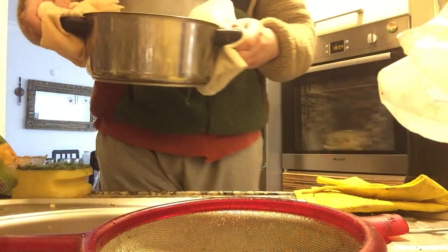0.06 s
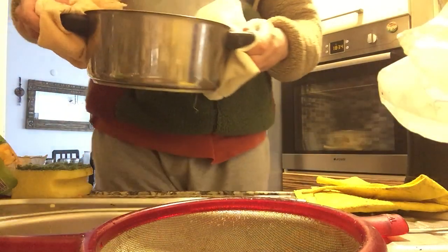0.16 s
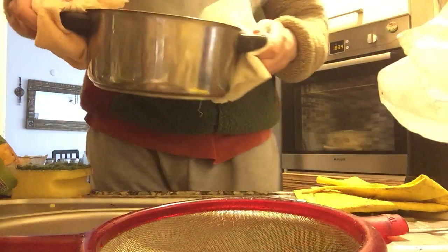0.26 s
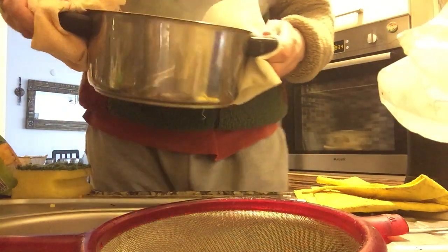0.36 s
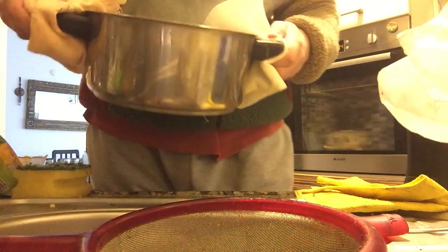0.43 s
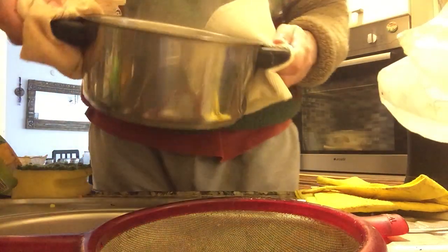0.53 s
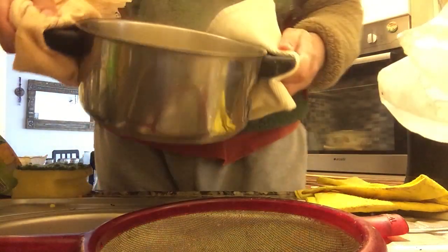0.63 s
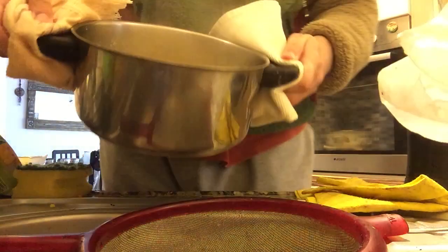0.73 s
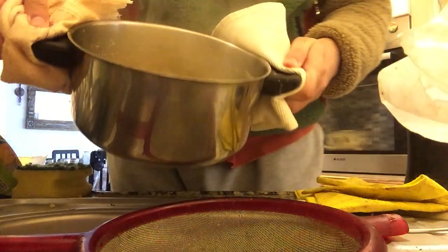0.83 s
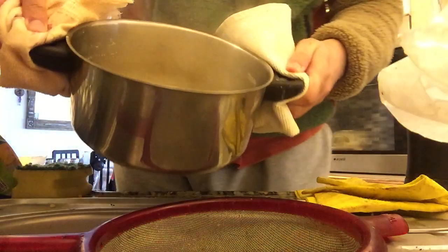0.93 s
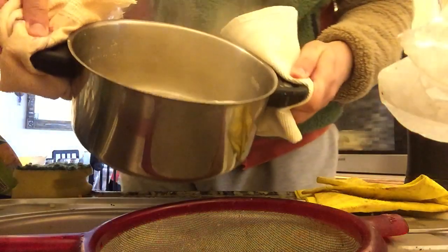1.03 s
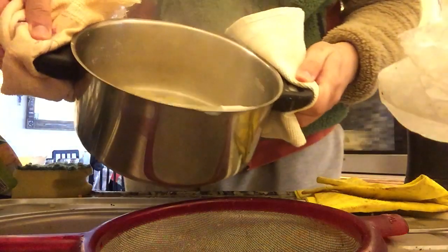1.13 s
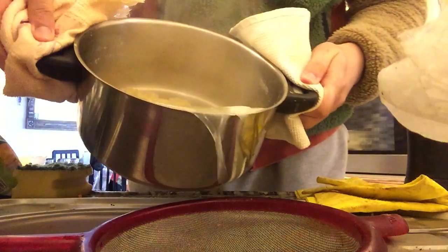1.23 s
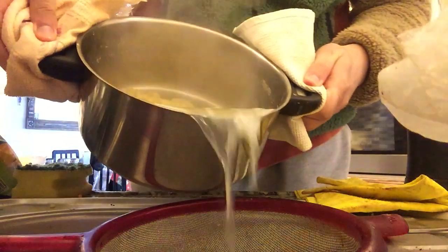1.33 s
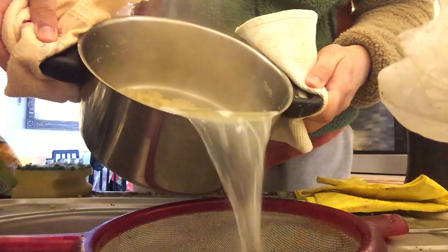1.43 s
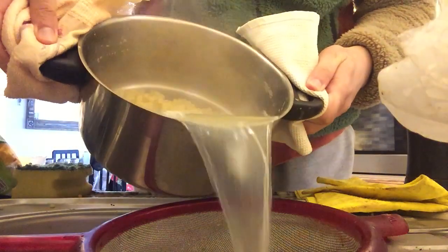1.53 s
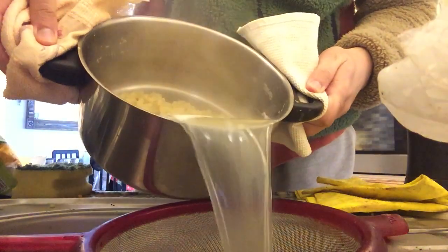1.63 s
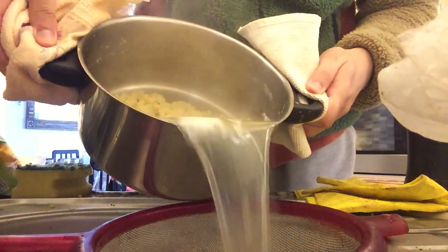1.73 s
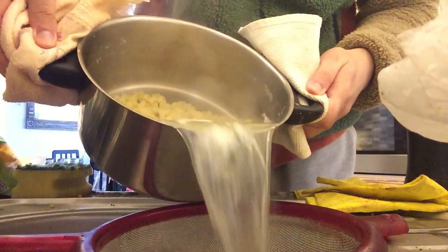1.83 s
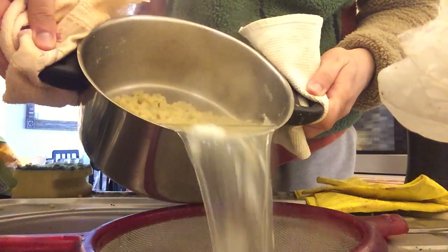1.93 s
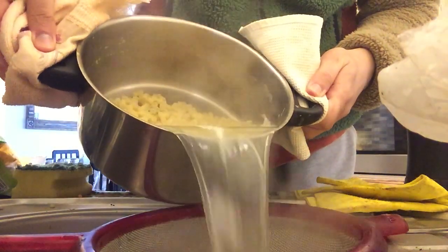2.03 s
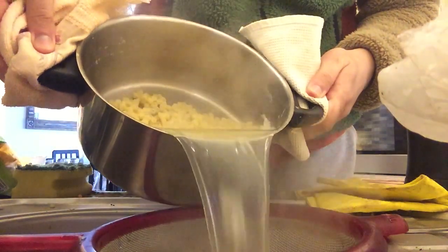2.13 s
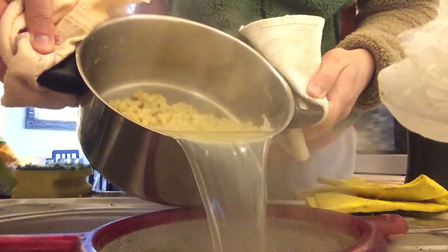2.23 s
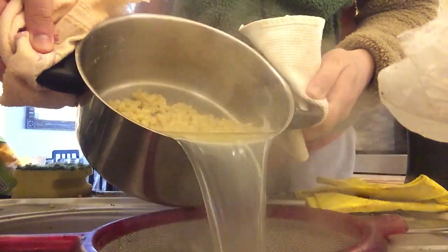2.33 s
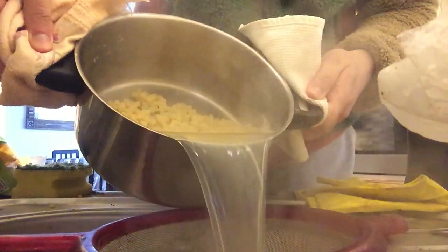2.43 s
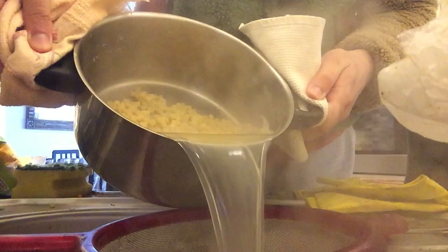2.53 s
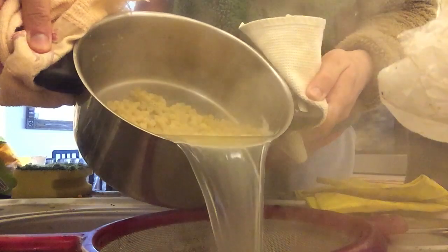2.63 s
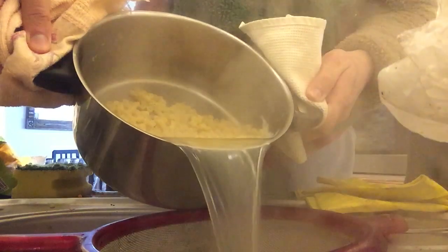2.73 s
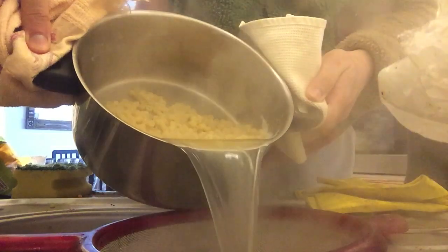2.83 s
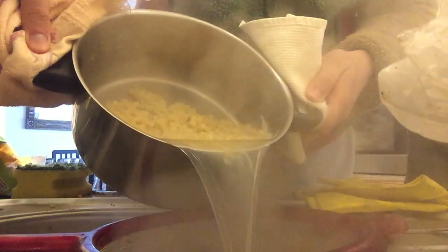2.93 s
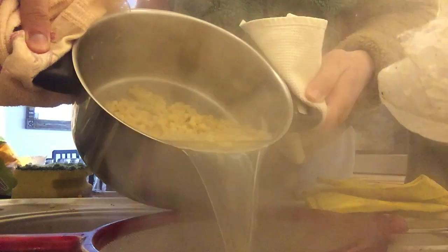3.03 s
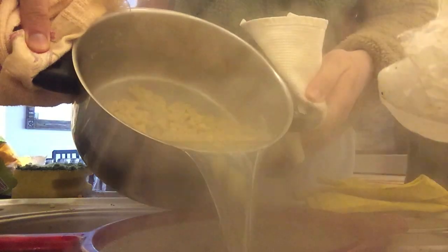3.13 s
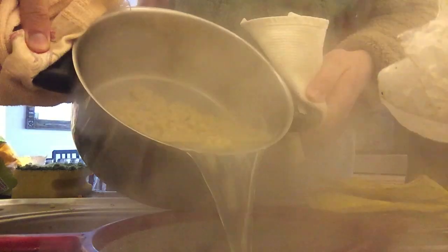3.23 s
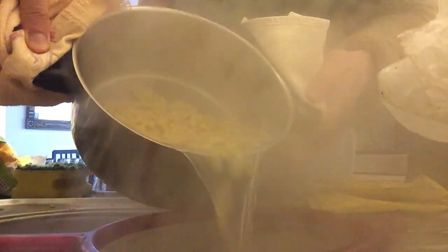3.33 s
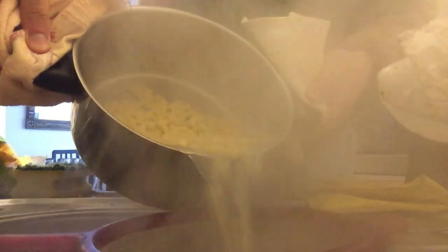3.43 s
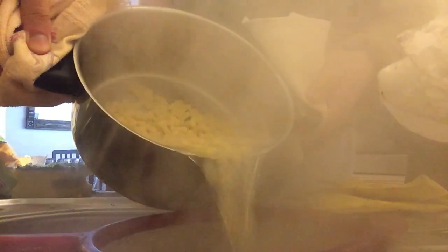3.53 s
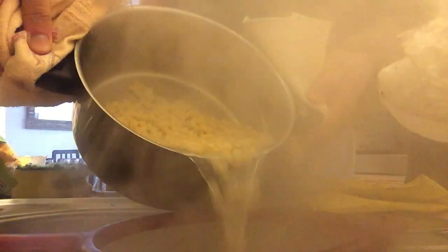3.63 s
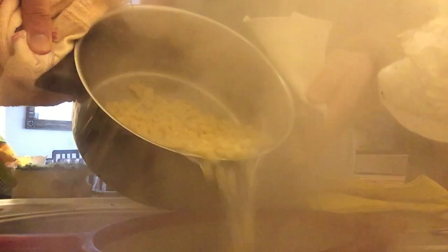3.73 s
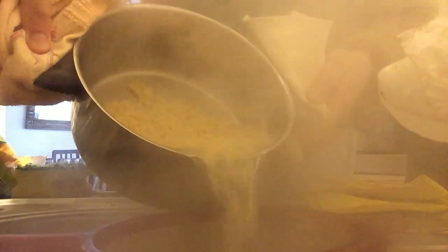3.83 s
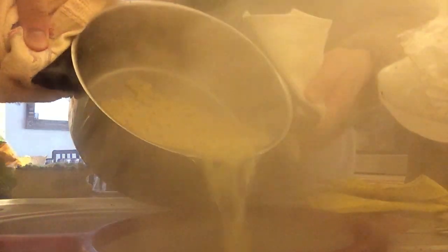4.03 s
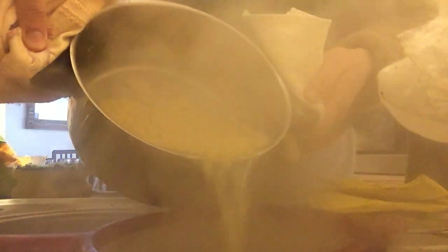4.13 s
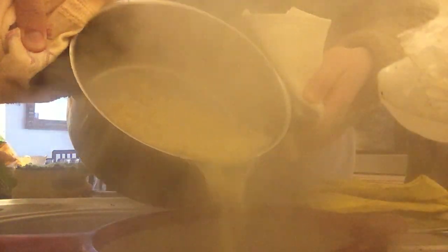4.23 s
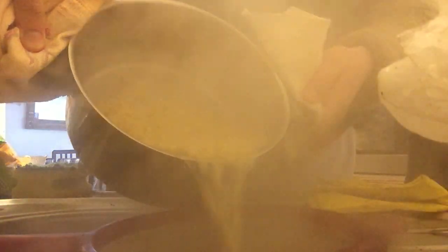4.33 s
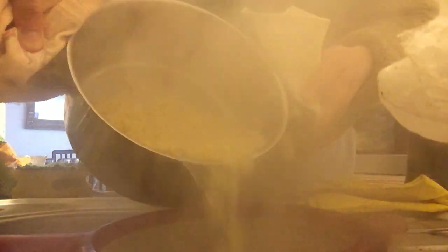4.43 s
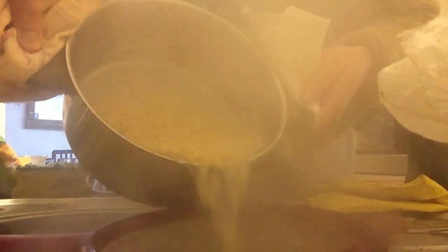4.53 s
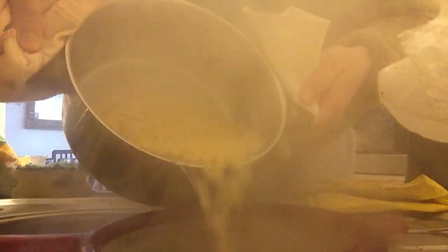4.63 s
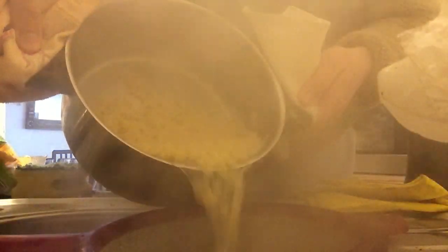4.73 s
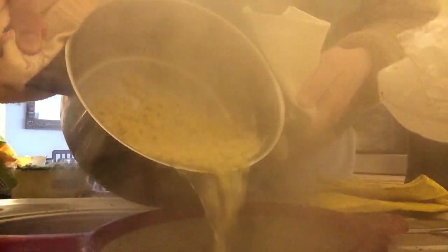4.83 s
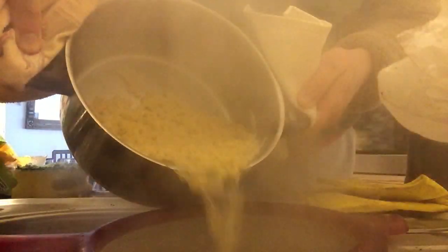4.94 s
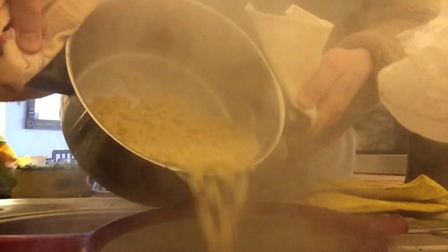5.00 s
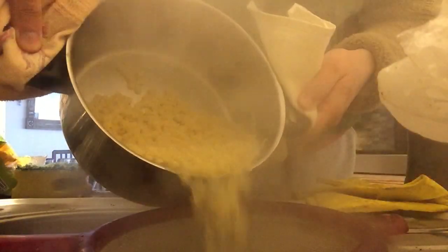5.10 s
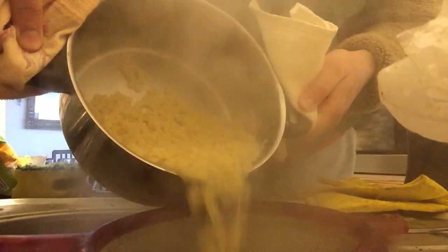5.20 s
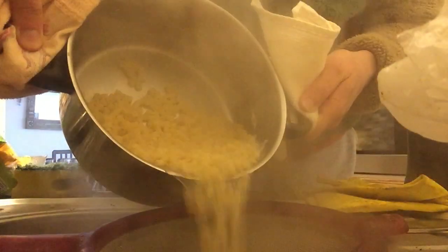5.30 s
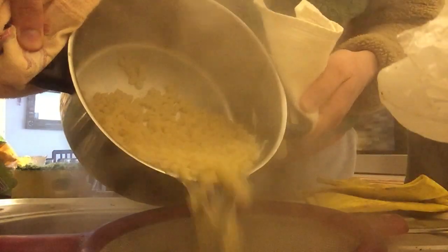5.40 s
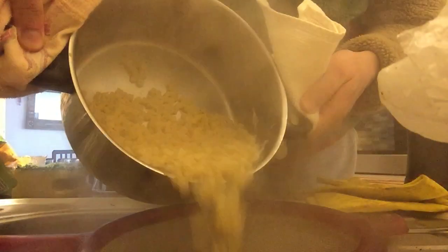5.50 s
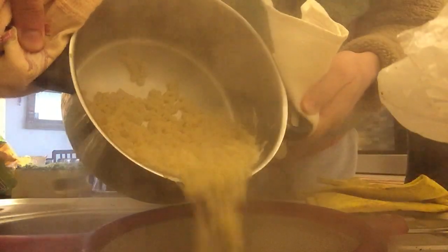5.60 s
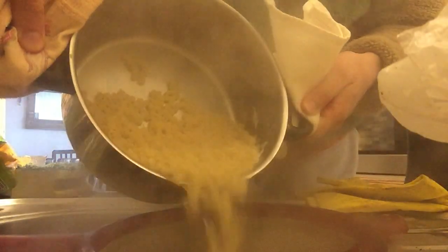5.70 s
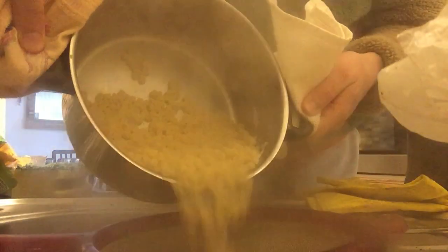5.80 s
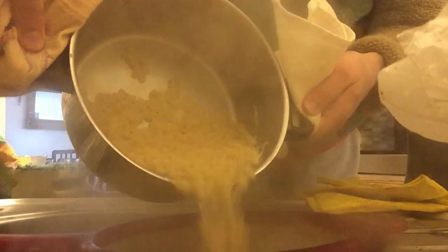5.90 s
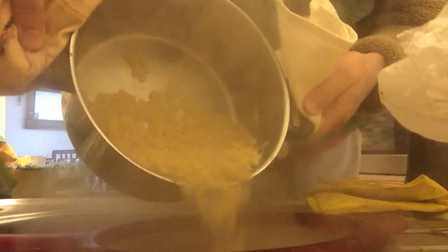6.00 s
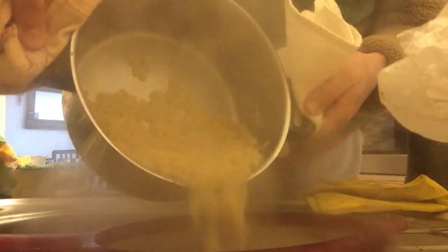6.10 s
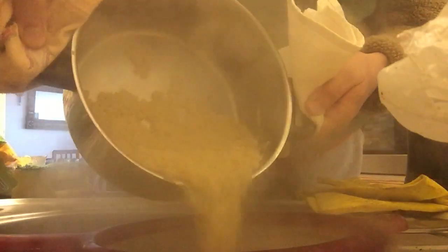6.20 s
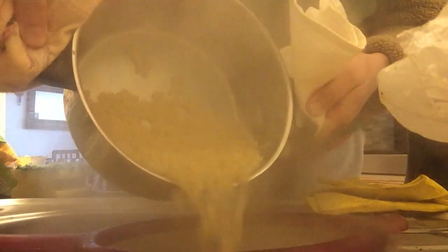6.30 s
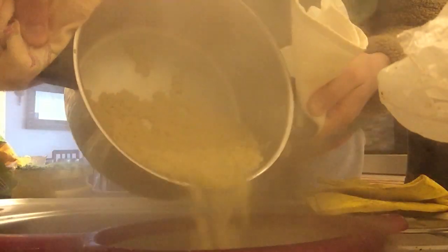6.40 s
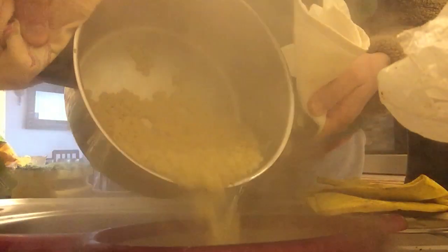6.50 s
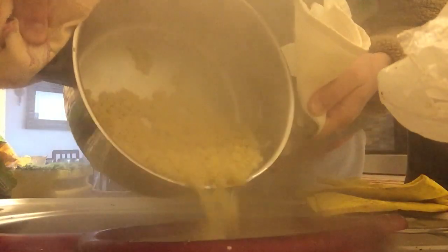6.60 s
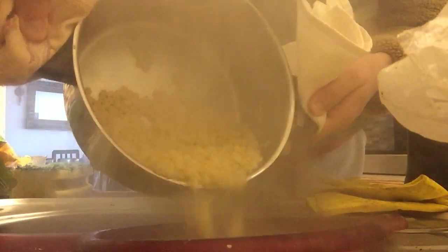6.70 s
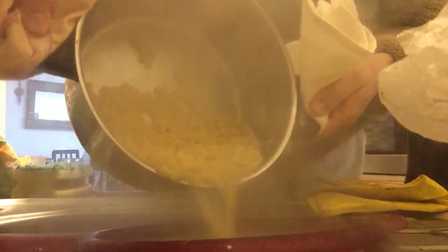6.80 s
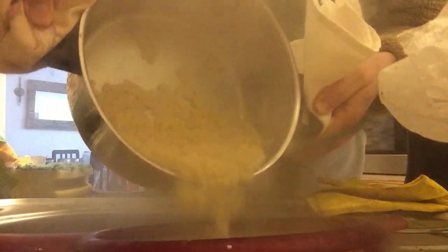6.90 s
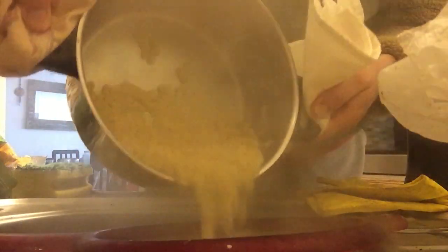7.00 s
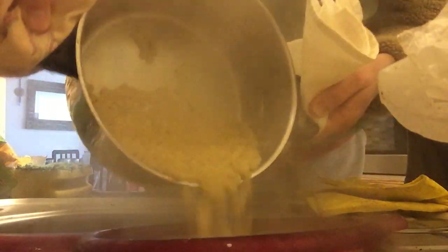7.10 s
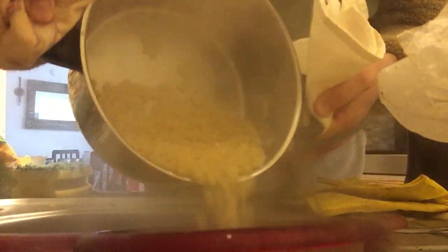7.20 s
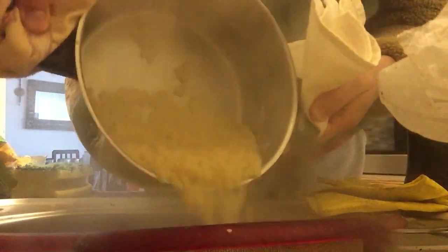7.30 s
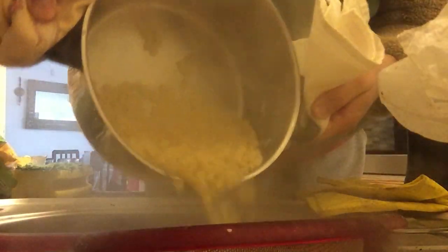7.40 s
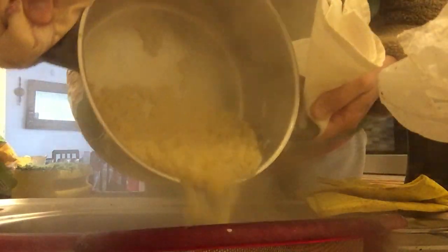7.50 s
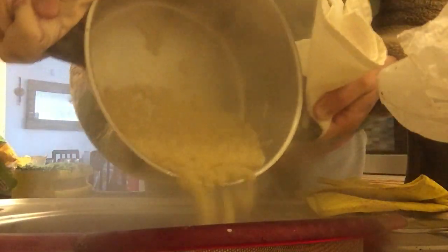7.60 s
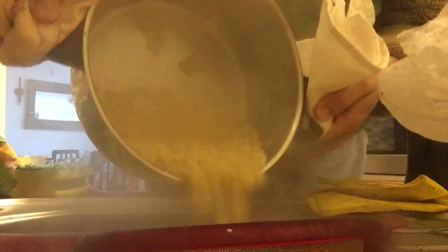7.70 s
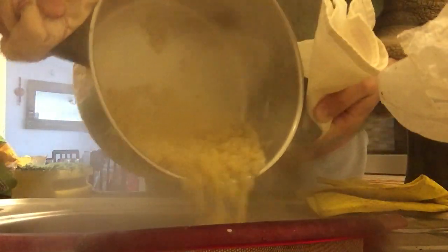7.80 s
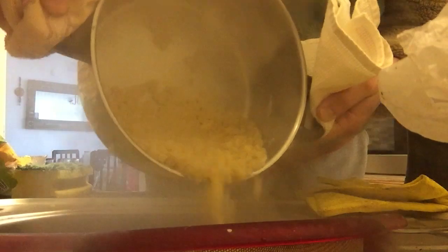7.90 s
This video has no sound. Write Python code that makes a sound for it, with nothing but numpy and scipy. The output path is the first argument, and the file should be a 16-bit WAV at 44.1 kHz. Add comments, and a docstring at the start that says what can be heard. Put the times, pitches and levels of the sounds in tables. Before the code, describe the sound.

A quiet small kitchen, heard from right beside the strainer: brief rustling scuffs, then a sudden gush of water on resonant steel with bright spray and frothy splashing. Deep hollow plops burst from the drain, followed by a string of bubbly, upward-sliding gurgles. The flow weakens to spattering, wet pasta slaps softly down, and the strainer knocks low against the basin over a faint room drone.

```python
"""Draining pasta into a sink

Scuffs and a faint sizzle come first; then pasta water is tipped through a mesh strainer into a steel sink.
The stream is random bursts of noise (mesh hiss, splash), bubble clouds and resonant drumming of the basin.
The drain swallows air in plops and gurgles, rising tones; wet pasta slides out in squelches of filtered noise.
Drips are short noise cracks, knocks are decaying modes; a small kitchen adds reflections and a low drone."""
import sys
import numpy as np
from scipy import signal
from scipy.fft import rfft, irfft
from scipy.io import wavfile
from scipy.ndimage import uniform_filter1d

SR = 44100
rng = np.random.default_rng(int(sys.argv[2]) if len(sys.argv) > 2 else 0)


def store_pcm(level_fs):
    """Save levels as 16-bit WAV."""
    pcm = np.round(np.clip(level_fs, -1, 1) * 32767).astype(np.int16)
    wavfile.write(sys.argv[1], SR, np.atleast_2d(pcm).T)


N = 350595


def undb(db):
    """Decibels to amplitude gain."""
    return 10 ** (np.asarray(db) / 20)


def unit(x):
    """Scale to rms 1."""
    return x / np.sqrt(np.mean(x ** 2) + 1e-20)


def even(x, window_s=.12):
    """Hold the rms near 1 over a sliding window, keeping the finer grain."""
    power = uniform_filter1d(x ** 2, int(window_s * SR))
    return x / np.sqrt(np.abs(power) + 1e-20)


def add(out, start_s, sound):
    """Mix a sound in at a start time."""
    i = int(np.clip(start_s * SR, 0, N))
    out[i:i + len(sound)] += sound[:N - i]


def clock(length_s):
    """Sample times in seconds, from 0 to the length."""
    return np.arange(max(int(length_s * SR), 8)) / SR


def fade(t, t60):
    """Free exponential decay, -60 dB after t60 seconds."""
    return np.exp(-np.log(1000) * t / t60)


def swell(start_s, db, attack_s, hold_s, t60):
    """A gain that rises linearly from its start, holds, then decays."""
    t = np.arange(N) / SR - start_s
    return undb(db) * np.clip(t / attack_s, 0, 1) * fade(np.maximum(t - attack_s - hold_s, 0), t60)


def track(table):
    """First value column of a table, interpolated for every sample."""
    s, value = np.transpose(table)[:2]
    return np.interp(np.arange(N) / SR, s, value)


def gain(table):
    """Gain curve from a (time, dB) table, silent before the first row."""
    s, db = np.transpose(table)
    return undb(np.interp(np.arange(N) / SR, s, db, left=-200))


def walk(rate_hz):
    """Slow random curve: Gaussian values joined by straight lines, spread near 1."""
    k = int(SR / rate_hz)
    steps = np.repeat(rng.standard_normal(N // k + 1), k)
    return np.sqrt(2) * uniform_filter1d(steps, k)[:N]


def colour(x, points):
    """Minimum-phase filter through (Hz, dB) points, built by folding the cepstrum."""
    hz, db = np.transpose(points)
    grid_hz = np.linspace(1, SR / 2, 2049)
    response_db = np.interp(np.log(grid_hz), np.log(hz), db)
    cepstrum = irfft(np.log(undb(response_db)))
    half = len(cepstrum) // 2
    cepstrum[1:half] *= 2
    cepstrum[half + 1:] = 0
    impulse = irfft(np.exp(rfft(cepstrum)))
    return signal.fftconvolve(x, impulse)[:len(x)]


def resonate(x, hz, width_hz):
    """One resonance, gain 1 at its centre."""
    return signal.lfilter(*signal.iirpeak(hz, hz / width_hz, fs=SR), x)


def band(x, lo_hz, hi_hz, order=3):
    """Butterworth band-pass."""
    return signal.sosfilt(signal.butter(order, [lo_hz, hi_hz], "band", fs=SR, output="sos"), x)


def waver(hz, width_hz):
    """Narrow noise around a fixed or moving centre frequency."""
    smooth = signal.butter(2, width_hz / 2, fs=SR, output="sos")
    drive = signal.sosfilt(smooth, rng.standard_normal(N) + 1j * rng.standard_normal(N))
    carrier = np.exp(2j * np.pi * np.cumsum(hz * np.ones(N)) / SR)
    return unit(np.real(drive * carrier))


def impacts(rate_hz, spread_db):
    """Random hits, many small and few large."""
    sizes = undb(spread_db * np.minimum(rng.standard_exponential(N), 4))
    return (rng.random(N) < rate_hz / SR) * sizes


def patter(rate_hz, spread_db, t60):
    """Each hit shatters into a short burst of noise with a slightly rounded start."""
    # power decays at twice the amplitude rate
    power = signal.lfilter([1], [1, -fade(2 / SR, t60)], impacts(rate_hz, spread_db) ** 2)
    envelope = np.sqrt(np.abs(uniform_filter1d(power, size=48)))
    return unit(envelope * rng.standard_normal(N))


def spatter(rate_hz, spread_db, t60):
    """Droplets of every size: each pitch range has its own hits."""
    centres_hz = np.geomspace(3000, 14000, num=7)
    return unit(sum(resonate(patter(rate_hz, spread_db, t60), hz, hz / 4) for hz in centres_hz))


def bubbles(count, lo_hz, hi_hz, cycles, rise, spread_db):
    """A cloud of small bubbles, each ringing briefly and rising in pitch."""
    out = np.zeros(N)
    for when, size, life, strength in rng.random((count, 4)):
        hz = lo_hz * (hi_hz / lo_hz) ** size
        t60 = cycles * (.5 + life) / hz
        t = clock(t60)
        loud = undb(-spread_db * np.log(strength + 0.0095))
        note = np.sin(2 * np.pi * hz * t * (1 + rise * t / t60))
        add(out, when * N / SR, loud * fade(t, t60) * note)
    return unit(out)


# drone spectrum: freq_hz, gain_db
ROOM_COLOUR = [(30, -11.5), (80, -20), (118, 1), (145, -5), (170, -14), (210, -8), (300, -14.5),
               (550, -22.5), (2000, -35.5), (16000, -53.5)]
ROOM_DB = -60


def room_drone():
    """Low kitchen drone: coloured noise with a slightly unsteady level."""
    return undb(ROOM_DB + walk(10)) * unit(colour(rng.standard_normal(N), ROOM_COLOUR))


# scuffs of the cook at the sink: start_s, level_db, attack_s, hold_s
SCUFFS = [(0.001, -52.5, 0.075, 0.17), (0.115, -45.5, 0.023, 0.005), (0.542, -55, 0.012, 0.059)]
SCUFF_T60_S = 0.17
# scuff spectrum: freq_hz, gain_db
SHUFFLE_COLOUR = [(200, -15), (360, -9.5), (658, -22), (990, -7.5), (2200, -6), (2730, -14.5), (14000, -45)]
# fine spray spectrum, shared by sizzle, mesh and drops: freq_hz, gain_db
SPRAY_COLOUR = [(2000, -12.5), (3700, -3), (5000, -7.5), (6500, -1.5), (9600, -1), (10400, -4),
                (11500, 1.5), (13500, -3), (16000, -9.5)]


def approach():
    """Noise-burst scuffs as the cook steps up, and a fine sizzle as the pot begins to tilt."""
    scuff = unit(colour(patter(rate_hz=1100, spread_db=1, t60=0.025), SHUFFLE_COLOUR))
    steps = sum(swell(*row, SCUFF_T60_S) for row in SCUFFS)
    fizz = unit(colour(patter(rate_hz=4100, spread_db=1, t60=0.0043), SPRAY_COLOUR))
    simmer = unit(band(rng.standard_normal(N), 880, 4200, order=2))
    # the hot pot ticks over faintly, then water creeps up its wall
    hot_pot = swell(0, db=-78.5, attack_s=0.0048, hold_s=0.98, t60=0.67)
    creep = swell(0.73, db=-69.5, attack_s=0.21, hold_s=0.23, t60=1.15)
    return steps * scuff + (hot_pot + creep) * (fizz + undb(-1.5) * simmer)


# steel basin modes: freq_hz, width_hz, gain_db
BASIN = [(52.6, 8.8, 0.5), (90.5, 47, -0.5), (114.3, 19, 4), (141.7, 8.9, 3), (201.7, 13, -2.5),
         (245.3, 12, -8), (289.8, 7.6, 9), (349.7, 22, -1.5), (410, 83, -8.5)]


def basin(push):
    """The sink's steel floor answers a push with its low modes, neighbours in opposite senses."""
    return sum((-1) ** k * undb(db) * resonate(push, hz, width) for k, (hz, width, db) in enumerate(BASIN))


# drain gulps shaking the basin: time_s, level_db
SUCTION = [(2.97, -49), (3.12, -35.5), (3.42, -39.5), (3.66, -34), (3.98, -49.5), (4.5, -43.5),
           (5.0, -46.5), (5.33, -48), (5.53, -68)]
# pasta clumps thudding into the strainer: start_s, level_db
CLUMPS = [(6.082, -47), (6.769, -53), (7.0, -50.5), (7.87, -51)]
CLUMP_ATTACK_S, CLUMP_HOLD_S, CLUMP_T60_S = 0.0098, 0.026, 0.26
POUR_S = 1.34  # first water lands
RUMBLE_DB, RUMBLE_LAW = -49.5, 0.6  # low modes; grows as flow to this power
DRUMMING_DB, DRUMMING_LAW = -45, 1.41  # the same for the higher modes
BARE_HZ, LOADED_HZ, LOADING_S = 410, 289, 0.22  # floor note sinks as water covers it


def drumming(flow):
    """The stream, the gulping drain and falling pasta all shake the steel basin."""
    low = even(band(basin(patter(rate_hz=130, spread_db=3, t60=0.0081)), 55, 150))
    rumble = undb(RUMBLE_DB) * flow ** RUMBLE_LAW * low
    high = even(band(basin(patter(rate_hz=190, spread_db=4, t60=0.006)), 177, 480))
    drum = undb(DRUMMING_DB) * flow ** DRUMMING_LAW * high
    shaking = band(basin(patter(rate_hz=300, spread_db=5.5, t60=0.0069)), 47, 170, order=2)
    gulps = gain(SUCTION) * even(shaking, window_s=0.45)
    landing = sum(swell(s, db, CLUMP_ATTACK_S, CLUMP_HOLD_S, CLUMP_T60_S) for s, db in CLUMPS)
    thuds = landing * even(band(basin(rng.standard_normal(N)), 77, 194, order=2))
    # the solid stream drums the floor: a broad falling note and a steady low hum
    age_s = np.maximum(np.arange(N) / SR - POUR_S, 0)
    note_hz = LOADED_HZ + (BARE_HZ - LOADED_HZ) * np.exp(-age_s / LOADING_S)
    upper = swell(POUR_S, db=-46, attack_s=0.12, hold_s=0.15, t60=0.9) * even(waver(note_hz, 150))
    lower = swell(1.377, db=-46, attack_s=0.28, hold_s=.1, t60=3.2) * even(waver(198, 37.2))
    return rumble + drum + gulps + thuds + upper + lower


# stream strength re full flow: time_s, level_db
FLOW = [(1.34, -11.5), (1.41, -14), (1.47, -3.5), (2.03, -2), (2.25, -4.5), (2.95, -5), (3.25, -7.5),
        (5.65, -11), (5.9, -14.5), (6.35, -15.5), (6.6, -18)]
# water standing in the sink: time_s, depth_0_to_1
POOL = [(1.66, 0), (1.95, 0.57), (2.4, 0.8), (2.95, 0.68), (3.18, 1), (3.68, 0.9), (3.98, 0.79),
        (5.35, 0.53), (6.0, 0.28)]
# splash spectrum: freq_hz, gain_db
SPLASH_COLOUR = [(400, -42), (580, -11), (820, -24), (1030, -4.5), (1300, -4.5), (1600, 0), (1780, -4.5),
                 (2250, 2), (2900, -13), (4800, -24), (8000, -40.5)]
SPRAY_DB = -51  # mesh hiss at full flow
SPLASH_DB, SPLASH_DEPTH_DB = -55, 15.5  # full flow on bare steel; added in a full pool


def stream():
    """Falling water drums, splashes and sprays; as it thins, the rush gives way to separate spatters."""
    flow, depth = gain(FLOW), track(POOL)
    thin = track([(2.6, 0.78), (4.0, 1)])
    full, broken = np.sqrt(1 - thin), np.sqrt(thin)
    # the plunging stream beats air into the pool; the trickle and the pasta only slap
    froth = bubbles(count=8000, lo_hz=480, hi_hz=4800, cycles=28, rise=.1, spread_db=3.7)
    slaps = patter(rate_hz=70, spread_db=3.8, t60=.036)
    churn = track([(3.2, .93), (5.3, .55), (5.7, .25)])
    churned = froth + .8 * patter(rate_hz=450, spread_db=3, t60=.018)
    wet = churn * churned + np.sqrt(1 - churn ** 2) * slaps
    rush = patter(rate_hz=900, spread_db=3.4, t60=.014)
    rush += .8 * spatter(rate_hz=250, spread_db=3.8, t60=.014)
    trickle = .8 * patter(rate_hz=140, spread_db=5, t60=.021)
    trickle += spatter(rate_hz=60, spread_db=4.6, t60=.025)
    mesh = full * rush + broken * trickle
    # the stream lands in lumps
    lumps = undb(walk(28))
    splash_gain = flow * undb(SPLASH_DB + SPLASH_DEPTH_DB * depth)
    splash = splash_gain * lumps * even(colour(wet, SPLASH_COLOUR))
    spray = undb(SPRAY_DB) * flow * unit(lumps * colour(mesh, SPRAY_COLOUR))
    # the first water smacks bare steel
    smack = unit(band(patter(rate_hz=440, spread_db=3.5, t60=0.013), 300, 960))
    smack *= swell(POUR_S, db=-58.5, attack_s=0.011, hold_s=0.34, t60=0.49)
    # tiny bubbles tinkle in the full stream's foam
    tinkle = bubbles(count=900, lo_hz=2600, hi_hz=4700, cycles=36, rise=.04, spread_db=4)
    foam = undb(-58.5 + 11 * depth) * flow * full * tinkle
    return drumming(flow) + smack + foam + splash + spray


# stray drops on steel and mesh: start_s, level_db, pitch_hz
DROPS = [(1.347, -54.5, 4560), (1.572, -38.5, 2870), (1.673, -32.5, 13800), (1.738, -42, 6500),
         (1.834, -46, 3300), (1.857, -37.5, 3770), (1.9196, -36.5, 6700), (2.0034, -35.5, 7060),
         (2.677, -40, 4220), (3.118, -35.5, 3770), (3.652, -39.5, 3570), (3.933, -37, 6750),
         (4.3652, -31, 9000), (5.013, -34.5, 9400), (5.093, -39.5, 9200), (6.198, -46.5, 4000),
         (6.259, -41.5, 12600), (6.419, -48, 9400), (7.6255, -40, 9480)]


def drops():
    """A drop is a bright crack of resonant noise with its own pitch, over within 40 ms."""
    out, t = np.zeros(N), clock(0.039)
    for (s, db, hz), noise in zip(DROPS, rng.standard_normal((len(DROPS), len(t)))):
        broad = unit(resonate(colour(noise, SPRAY_COLOUR), hz, hz / 2))
        crack = unit(broad + 0.51 * unit(resonate(noise, hz, 500)))
        add(out, s, undb(db - 3) * crack * (fade(t, 0.014) + 0.18 * fade(t, 0.21)))
    return out


# slaps of water and wet pasta: start_s, level_db, centre_hz
SQUELCHES = [(1.591, -43, 2530), (1.7348, -37.5, 2080), (1.886, -38.5, 2470), (2.043, -33, 1920),
             (2.2262, -33.5, 1430), (2.7349, -34, 1260), (3.931, -35.5, 2300), (4.2794, -35.5, 1510),
             (4.662, -37, 2110), (5.092, -34, 2100), (5.495, -43, 1970), (5.7274, -46, 2200),
             (6.097, -48.5, 910), (6.1414, -46, 1610), (6.196, -52, 2150), (6.2777, -45, 2130),
             (6.435, -47, 1610), (6.627, -52, 986), (7.003, -45.5, 1680), (7.185, -51, 1290),
             (7.303, -48, 1900), (7.3863, -44, 1530), (7.794, -44, 2036), (7.84, -50, 1940)]


def squelches():
    """Water or wet pasta smacks softly, coloured by the air it squeezes out, and splutters as it settles."""
    out, t = np.zeros(N), clock(0.09)
    settling = patter(rate_hz=300, spread_db=2, t60=.012)
    for (s, db, hz), noise in zip(SQUELCHES, rng.standard_normal((len(SQUELCHES), len(t)))):
        splutter = settling[int(s * SR):][:len(t)] * fade(t, 0.07)
        contact = noise * fade(t, 0.057) + 0.42 * splutter
        soft_start = 1 - fade(t, 0.0046)
        smack = band(resonate(contact * soft_start, hz, 390), 340, 2950)
        add(out, s, undb(db - 15.5) * unit(smack))
    return out


# pitch of the emptying pot's wall: time_s, pitch_hz
POT_NOTE = [(1.74, 1580), (1.83, 1422), (1.88, 1476)]


def pot():
    """The pot's wall sings briefly as narrow noise, its pitch bent by the shifting water."""
    return swell(1.735, db=-49.5, attack_s=0.02, hold_s=0.065, t60=1.0) * waver(track(POT_NOTE), 65)


def offshoots(lo_hz, hi_hz, count):
    """A big pocket sheds a few small rising bubbles at random moments and pitches; late ones are weaker."""
    out, t = np.zeros(N), clock(.05)
    for when, size, strength in rng.random((count, 3)):
        hz = lo_hz * (hi_hz / lo_hz) ** size
        tone = np.sin(2 * np.pi * hz * t * (1 + 5 * t))
        note = tone * fade(t, 45 / hz) * (1 - fade(t, .006))
        add(out, .008 + .06 * when, undb(-7 * when - 7 * strength) * note)
    return out[:len(clock(.12))]


# air pockets bursting in the drain: start_s, thump_db, thump_hz, ring_db, ring_hz, ring_t60_s
PLOPS = [(2.971, -31, 290, -38, 1490, 0.025), (3.127, -18, 560, -20, 1026, 0.021),
         (3.2187, -21.5, 218, -23, 1160, 0.01), (3.3255, -15.5, 686, -5, 1510, 0.023),
         (3.416, -15, 720, -18.5, 1090, 0.016), (3.517, -31, 493, -21.5, 1417, 0.038),
         (3.557, -30, 513, -19.5, 1090, 0.056), (3.614, -25, 274, -29, 686, 0.047),
         (3.6515, -25.5, 393, -19.5, 1090, 0.026), (3.667, -32.5, 250, -45, 1030, 0.034),
         (3.884, -27, 493, -27, 1150, 0.037), (5.293, -26, 610, -31, 1080, 0.055),
         (5.756, -37, 468, -41.5, 1065, 0.046)]
# drain resonances, shared by plops and gurgles: freq_hz, gain_db
DRAIN_COLOUR = [(300, 4.5), (490, -2), (675, 1), (820, -12), (930, -6.5), (1050, 3), (1230, 0),
                (1400, -1.5), (1540, 1), (1840, -2.5), (2200, -9)]


def plops():
    """A pocket collapses with a push and pull, rings unsteadily and sheds bubbles; the basin booms."""
    (thumps, rings, fizz), t = np.zeros((3, N)), clock(.12)
    lead_s = .005
    wobble = walk(220)
    for s, thump_db, thump_hz, ring_db, ring_hz, t60 in PLOPS:
        u = 2 * np.pi * thump_hz * (t - lead_s)
        add(thumps, s - lead_s, -undb(thump_db) * u * np.exp((1 - u ** 2) / 2))
        drift = 1 + t * (4 + 7 * wobble[int(s * SR):][:len(t)])
        phase = 2 * np.pi * ring_hz * np.cumsum(drift) / SR
        main = np.sin(phase) * fade(t, t60)
        # the torn-off side pockets die sooner than the main one
        sides = (np.sin(0.86 * phase) + np.sin(1.2 * phase)) * fade(t, t60 / 2)
        add(rings, s, undb(ring_db) * (0.93 * main + 0.42 * sides))
        add(rings, s, undb(min(ring_db - 7, -26)) * offshoots(800, 2000, count=6))
        add(fizz, s, undb(min(ring_db - 12, -36)) * offshoots(2600, 4400, count=3))
    boom = undb(3) * basin(thumps)
    return colour(thumps + band(rings, 750, 1800), DRAIN_COLOUR) + boom + fizz


# single bubbles in the pool: start_s, pitch_hz, level_db
BUBBLES = [(3.142, 1130, -34), (3.17, 843, -35.5), (3.361, 1230, -31), (3.435, 990, -36),
           (3.688, 1060, -30), (3.776, 967, -28.5), (4.089, 1505, -38), (4.13, 1480, -37.5),
           (4.486, 3140, -49), (4.518, 985, -34), (4.701, 2700, -49), (4.861, 1466, -39), (4.889, 986, -38),
           (4.904, 967, -32.5), (4.933, 1860, -41), (5.157, 996, -34), (5.394, 967, -37.5),
           (7.906, 320, -47.5)]
BUBBLE_RISE_OCT_PER_S = 8.1
BUBBLE_ONSET_S, BUBBLE_T60_S = 0.0055, 0.054  # at 1 kHz; onset is half rise, half hold


def bloops():
    """A lone bubble swells into a short rising note; the small ones die sooner."""
    out, t = np.zeros(N), clock(.12)
    for s, hz, db in BUBBLES:
        age = t * np.sqrt(hz / 1000)
        onset = np.minimum(2 * age / BUBBLE_ONSET_S, 1)
        shape = onset * fade(np.maximum(age - BUBBLE_ONSET_S, 0), BUBBLE_T60_S)
        phase = 2 * np.pi * np.cumsum(hz * 2 ** (BUBBLE_RISE_OCT_PER_S * t)) / SR
        add(out, s, undb(db) * shape * np.sin(phase))
    return out


# air necks closing in the drain: start_s, start_hz, length_s, level_db
GURGLES = [(3.751, 504, 0.037, -28.5), (3.891, 413, 0.023, -35), (4.016, 582, 0.029, -27.5),
           (4.122, 469, 0.047, -34.5), (4.226, 489, 0.041, -30), (4.291, 605, 0.042, -29),
           (4.355, 416, 0.056, -37), (4.479, 433, 0.044, -26.5), (4.541, 618, 0.024, -35),
           (4.611, 409, 0.04, -30), (4.673, 659, 0.044, -29), (4.7396, 470, 0.026, -34.5),
           (4.8, 518, 0.032, -33), (4.836, 369, 0.023, -31.5), (4.864, 510, 0.028, -30.5),
           (4.972, 407, 0.035, -35), (5.027, 654, 0.042, -34.5), (5.122, 562, 0.038, -38.5),
           (5.232, 398, 0.035, -40.5), (5.292, 682, 0.031, -25.5), (5.362, 484, 0.035, -36),
           (5.394, 391, 0.021, -34.5), (5.42, 623, 0.021, -31), (5.683, 584, 0.044, -45.5)]
GURGLE_RISE_OCT_PER_S = 22.5
GURGLE_SNAP_DB, GURGLE_TAIL_DB = -4.5, -14.5  # click of the closing neck; what sings on after the main note
GURGLE_WET_DB, GURGLE_WET_T60_S = -16.5, 0.051  # water torn loose as the neck closes
GURGLE_UPPER_DB, GURGLE_UPPER_T60_S = -12.5, 0.086  # smaller pocket sweeping up above the main one


def gurgles():
    """An air neck snaps shut with a suck and splutter, then sings upward as the trapped pocket shrinks."""
    tones, sucks, tearing, shed = np.zeros((4, N))
    t = clock(.12)
    chances = rng.standard_normal((len(GURGLES), 2, 9))
    pockets = rng.random((len(GURGLES), 2))
    for (s, start_hz, length, db), chance, (size, delay) in zip(GURGLES, chances, pockets):
        age = t / length
        bend, flutter = (np.interp(age, np.linspace(0, 1, len(c)), c) for c in chance)
        pitch_hz = start_hz * 2 ** (GURGLE_RISE_OCT_PER_S * t + 0.09 * bend)
        phase = 2 * np.pi * np.cumsum(pitch_hz) / SR
        tail = undb(GURGLE_TAIL_DB) * np.clip(2 - age, 0, 1)
        body = np.clip((1 - age) / 0.28, 0, 1)
        shape = np.maximum(body, tail) * undb(-5.5 * age + 2.4 * flutter)
        snap = undb(GURGLE_SNAP_DB) * fade(t, 0.0021)
        add(tones, s, -undb(db) * (shape * np.sin(phase) + snap))
        # the suck is one smooth pulse over the first half cycle
        add(sucks, s, -undb(db) * np.sin(np.minimum(phase, np.pi)) ** 2)
        add(tearing, s, undb(db) * fade(t, GURGLE_WET_T60_S))
        # a smaller pocket follows higher up
        upper = np.sin((1.7 + size / 2) * phase) * np.minimum(2 * age, 1) * fade(t, GURGLE_UPPER_T60_S)
        add(shed, s + delay * length, undb(db + GURGLE_UPPER_DB) * upper)
        add(shed, s, undb(db - 7) * offshoots(850, 2400, count=7))
    wet = unit(band(patter(rate_hz=760, spread_db=5.5, t60=0.0017), 460, 1300, order=2))
    splutter = undb(GURGLE_WET_DB) * tearing * wet
    singing = band(colour(tones + splutter, DRAIN_COLOUR) + 0.33 * sucks, 25, 1640, order=2)
    return singing + colour(shed, DRAIN_COLOUR) + basin(sucks)


# dull knocks of the strainer on the basin: start_s, peak_db
KNOCKS = [(7.297, -31.5), (7.855, -44.5)]
# modes of the knock: freq_hz, level_db, t60_s
KNOCK_MODES = [(77.3, -6.5, 0.36), (134, -9, 0.24), (294, -13, 0.48), (546, 8.5, 0.026)]
KNOCK_SCRAPE_DB = -13  # re knock


def knocks():
    """The strainer's rim drags briefly, then lands in a sum of decaying modes with a softened start."""
    out, t = np.zeros(N), clock(0.5)
    modes = sum(undb(db) * fade(t, t60) * np.sin(2 * np.pi * hz * t) for hz, db, t60 in KNOCK_MODES)
    blow = modes * (1 - fade(t, 0.026))
    scrape = even(band(rng.standard_normal(N), 180, 640, order=2))
    lead_s = .018
    for s, db in KNOCKS:
        add(out, s, undb(db) * blow / np.abs(blow).max())
        out += scrape * swell(s - lead_s, db + KNOCK_SCRAPE_DB, 2 * lead_s, 0, t60=0.11)
    return out


def kitchen(x, near_db, near_t60, room_db, room_t60):
    """Convolve with decaying noise: bright reflections inside the sink, then the room's short tail."""
    t = clock(.6)
    near, far = rng.standard_normal((2, len(t))) * (1 - fade(t, 0.032))
    near = band(near, 1500, 12300, order=2) * fade(t, near_t60)
    far = band(far, 87, 5200, order=1) * fade(t, room_t60)
    echo = undb(near_db) * near / np.linalg.norm(near) + undb(room_db) * far / np.linalg.norm(far)
    return x + signal.fftconvolve(x, echo)[:N]


def scene():
    """Everything at the sink, over the low drone of the kitchen."""
    sources = approach() + stream() + drops() + squelches() + pot()
    sources += plops() + bloops() + gurgles() + knocks()
    wet = kitchen(sources, near_db=-7, near_t60=0.016, room_db=-19, room_t60=0.19)
    return (wet + room_drone())[None]


BASS_CUT_HZ, TOP_HZ = 38, 16000


def record(dry):
    """Cut the deepest bass gently and the extreme treble steeply."""
    lean = signal.sosfilt(signal.butter(4, BASS_CUT_HZ, "high", fs=SR, output="sos"), dry)
    return signal.sosfilt(signal.ellip(10, .2, 80, TOP_HZ, fs=SR, output="sos"), lean)


dry = scene()
out = record(dry)
store_pcm(out)
```